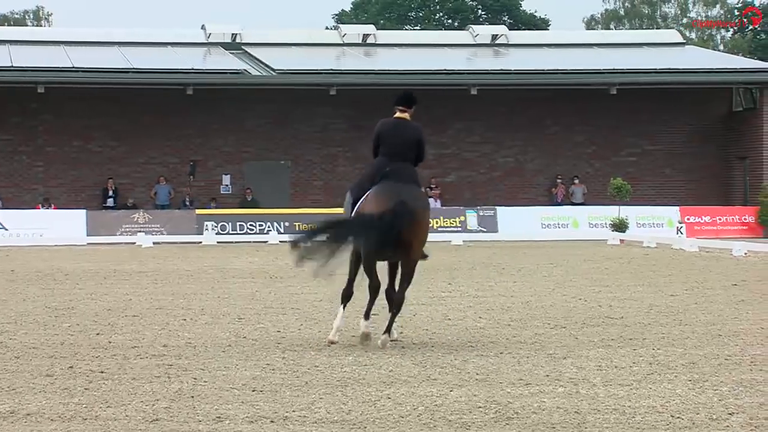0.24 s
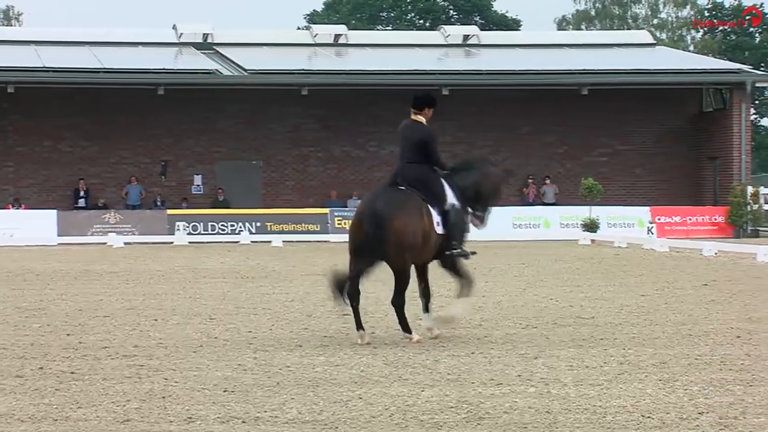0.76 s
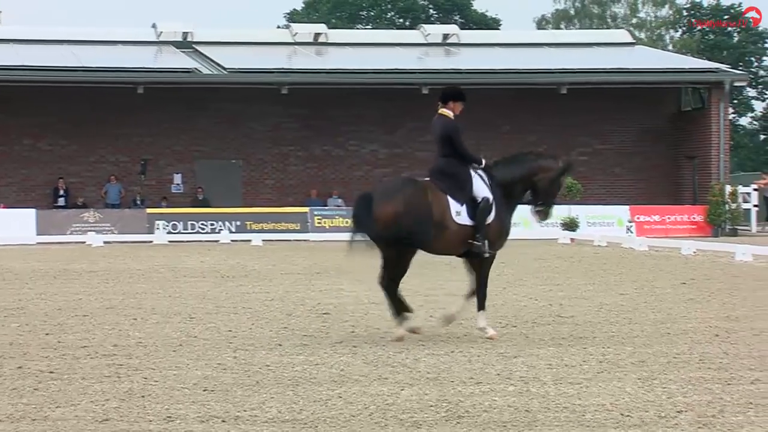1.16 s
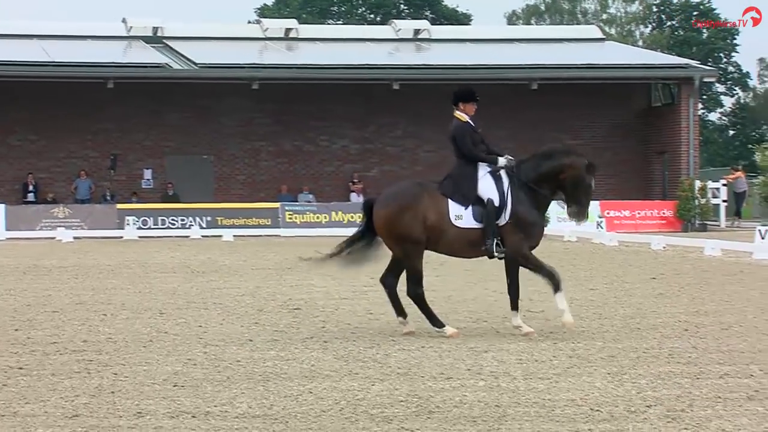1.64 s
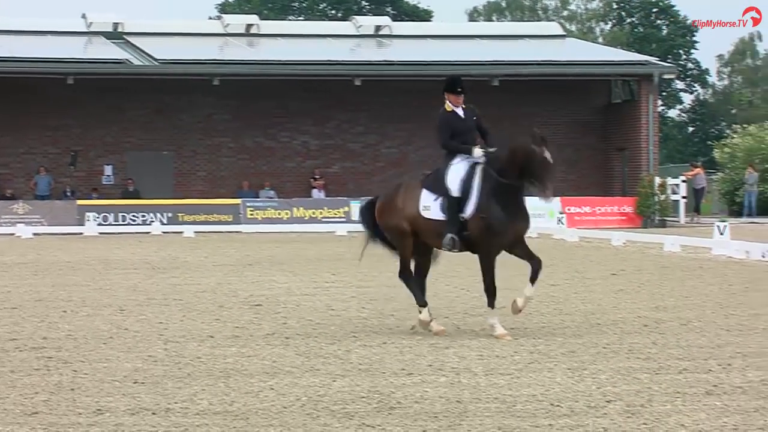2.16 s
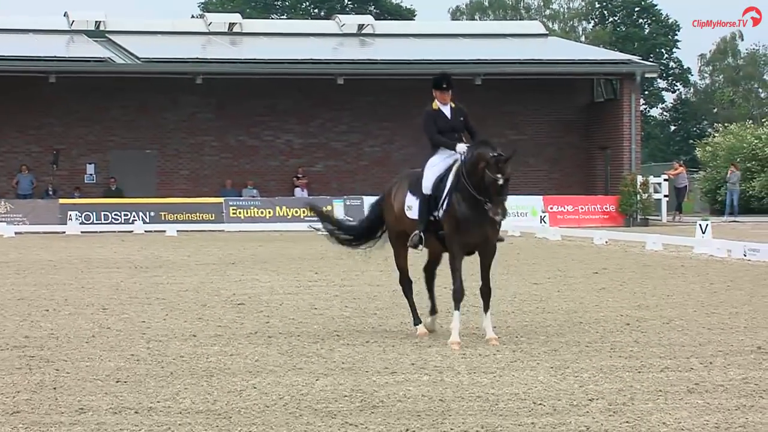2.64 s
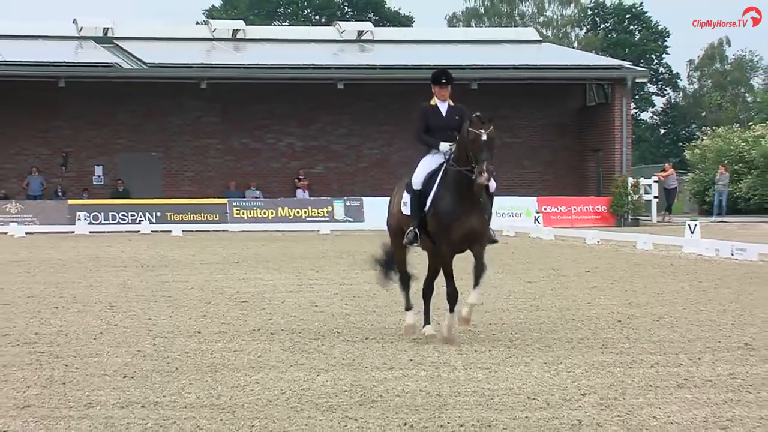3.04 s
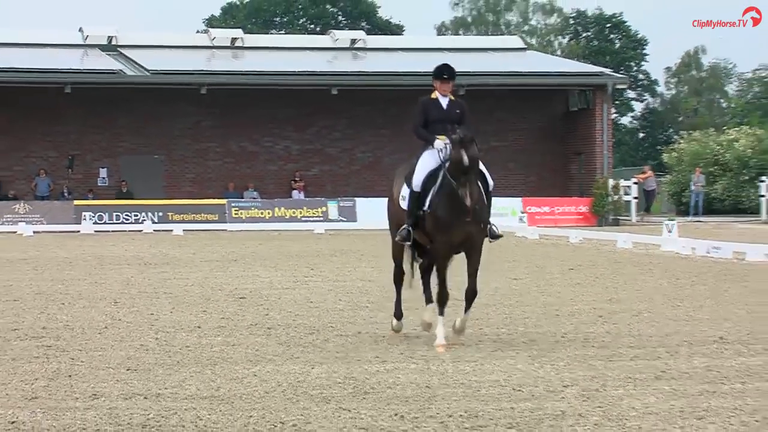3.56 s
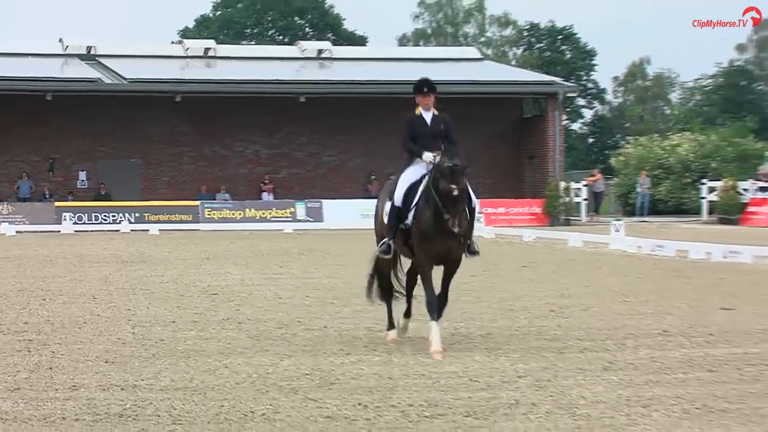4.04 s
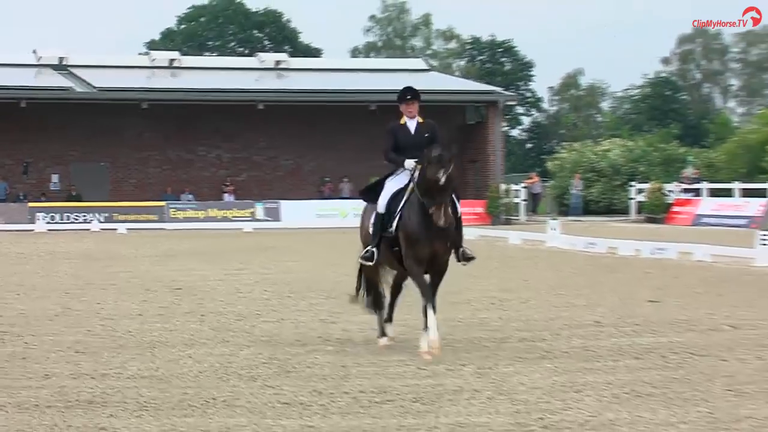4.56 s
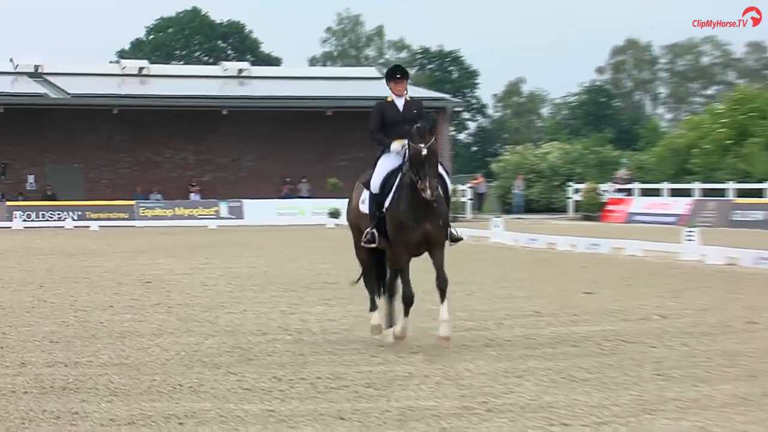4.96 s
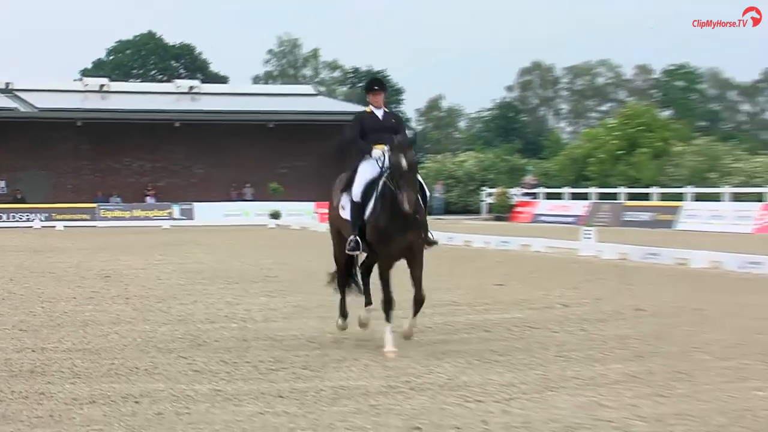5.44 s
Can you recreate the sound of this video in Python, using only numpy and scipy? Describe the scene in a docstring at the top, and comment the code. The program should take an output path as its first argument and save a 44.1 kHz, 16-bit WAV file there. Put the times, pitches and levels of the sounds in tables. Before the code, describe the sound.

Some way off in an open sandy arena, a horse canters with soft, grouped hoof thuds, dull knocks and brief crunches. It breathes in time, drawing hissing air and snorting with loose nostril flaps, more strongly later. Tack ticks faintly. Small birds and a blackbird open the scene; a chaffinch phrase takes over in the second half. Low wind nudges the microphone over a quiet countryside murmur.

```python
"""A horse canters on the sand of an outdoor arena, some way off: damped thuds, knocks and bursts of crunching noise.
It draws air and snorts it out through flapping nostrils (coloured noise under swelling envelopes); the tack ticks
and there are two faint squeaks. A blackbird, a chaffinch and small twittering birds sing in the trees (warbling sine
tones with scatter and tails). A light wind rumbles on the microphone over a steady countryside murmur."""
import sys
import numpy as np
from scipy import signal
from scipy.fft import rfft, irfft
from scipy.io import wavfile
from scipy.ndimage import uniform_filter1d

SR = 44100
rng = np.random.default_rng(int(sys.argv[2]) if len(sys.argv) > 2 else 0)


def unload_wav(signal):
    """Save mono or channel-first audio to the path in sys.argv[1] as 16-bit WAV at rate SR, clipped to [-1, 1]."""
    wavfile.write(
        sys.argv[1],
        SR,
        np.round(np.clip(np.atleast_2d(signal).T, -1, 1) * 32767).astype(np.int16),
    )


N = 251811
TIME = np.arange(N) / SR   # s
CUTOFF_HZ = 15000

# Event levels are relative: group gains and envelopes follow.

# gusts on the microphone: strongest t/s, length/s, level/dB
GUSTS = [(.19, .4, -48), (.62, .18, -53), (1.28, .7, -36), (1.7, .6, -39), (2.15, .5, -48),
         (2.48, .16, -41), (2.8, .5, -43), (3.27, .46, -36.5), (3.7, .9, -42.5), (4.33, .24, -39),
         (5.0, .55, -41), (5.37, .34, -36), (5.62, .22, -44)]
WIND_DB, BREEZE_DB, AIR_DB = -1, -65, -60.4   # gust gain, breeze between gusts, countryside murmur
# wind and countryside spectra: f/Hz, relative density/dB per Hz
WIND_COLOUR = [(8, -8), (15, 8.5), (26, -2), (40, -6.5), (60, -19.5), (100, -30), (200, -53), (500, -87)]
AIR_COLOUR = [(30, -3), (70, 0), (150, 0), (250, -6.5), (420, -10.5), (700, -20.5), (1000, -28),
              (1400, -37), (2300, -39.5), (3400, -33), (5000, -37), (7000, -46.5), (12000, -52),
              (15000, -66)]

# snorts: start t/s, strongest t/s, end t/s, level/dB
SNORTS = [(-.05, .05, .4, -61), (1.03, 1.11, 1.23, -59.5), (1.8, 1.94, 2, -56), (2.25, 2.3, 2.49, -64),
          (2.65, 2.7, 2.88, -54.5), (3.3, 3.59, 3.76, -55), (4.04, 4.24, 4.315, -51.8),
          (4.68, 4.87, 4.985, -51.5), (5.32, 5.44, 5.58, -50)]
# air drawn in: start t/s, strongest t/s, end t/s, level/dB
INTAKES = [(.68, .8, 1.02, -65), (1.48, 1.66, 1.77, -64), (2.42, 2.53, 2.7, -68), (3.2, 3.3, 3.4, -64),
           (3.73, 3.84, 4.13, -62.5), (4.42, 4.57, 4.67, -58), (5.03, 5.19, 5.35, -58.5),
           (5.61, 5.72, 6.03, -63)]
# runs of nostril flaps: first t/s, last t/s, flaps, spray level/dB, spray growth/dB per flap, puff level/dB
FLUTTERS = [(1.849, 1.849, 1, -78, 0, -56), (2.3, 2.3, 1, -75.5, 0, -61), (2.677, 2.83, 4, -74.5, -.3, -54),
            (3.536, 3.632, 3, -70.5, 1.6, -53), (4.174, 4.274, 3, -68.5, 4.3, -52),
            (4.761, 4.911, 4, -64.5, 3.2, -43), (5.357, 5.503, 4, -64.5, 3.3, -46.5)]
# puffs peak this far through a run; fall in dB per squared flap from there
PUFF_PEAK_SHARE, PUFF_FALL_DB = .72, 2.4
# breath spectra: f/Hz, relative density/dB per Hz
SNORT_COLOUR = [(60, -3), (150, 1.5), (350, 2), (480, -4), (620, 1.5), (900, -8.5), (1350, -26.5),
                (2200, -29), (3800, -24.5), (6000, -34.5), (10000, -40.5), (15000, -48.5)]
SPRAY_COLOUR = [(600, -21), (1100, 0), (1700, 9.5), (2500, -6), (4000, -3.5), (5500, 2), (7300, 1.5),
                (10000, -5.5), (13000, -15), (16000, -28)]
PUFF_COLOUR = [(40, -23), (95, 0.5), (130, 11), (220, -20), (400, -13.5), (900, -17), (1500, -39)]
INTAKE_COLOUR = [(120, -6), (330, 7), (600, 3.5), (800, -10.5), (1500, -21.5), (3500, -16), (5000, -17),
                 (6600, -23.5), (7700, -30), (9300, -21.5), (11000, -32), (13000, -44)]

# blackbird notes: t/s, length/s, first f/Hz, middle f/Hz, last f/Hz, level/dB, warble depth/Hz
BLACKBIRD = [(0.0, .125, 2080, 2070, 2170, -70, 100), (.09, .22, 2220, 2395, 2136, -75.5, 107),
             (.31, .068, 2316, 2340, 2310, -82, 40), (1.46, .057, 2200, 2340, 2500, -78, 9),
             (1.5, .039, 2056, 2094, 2150, -67, 3), (1.68, .084, 2250, 2156, 2210, -75.5, 126),
             (2.0, .053, 1740, 1800, 2350, -73.5, 3), (2.05, .029, 2230, 2080, 1710, -73, 0),
             (2.18, .205, 1560, 1589, 1545, -75.5, 0), (2.48, .066, 2880, 2260, 1760, -77, 3),
             (2.57, .045, 2880, 2410, 2000, -77.5, 60), (3.04, .06, 1740, 2350, 3100, -86, 0),
             (5.19, .07, 2310, 2260, 2320, -79, 0)]
# small birds' call notes: delay/s, length/s, first, middle, last f/share of call pitch, level/dB, warble depth/Hz
CHIP = [(0, .031, .78, 1, .77, 0, 0)]
DROOP = [(0, .032, 1, .97, .88, 0, 0)]
SLUR = [(0, .03, .88, 1, 1.06, 0, 0)]
CHIRRUP = [(0, .022, .97, 1.02, .99, -.5, 170), (.02, .026, .95, .87, .85, 0, 170),
           (.05, .023, .84, .74, .72, -2.5, 120)]
# arched chips, drooping peeps, rising slurs, three-step falling chirrups: t/s, pitch f/Hz, level/dB
CHIPS = [(.016, 5220, -83), (.07, 5300, -84), (.113, 5150, -79), (.207, 4850, -77.5), (.248, 3250, -77.5),
         (.33, 5900, -84), (.345, 4600, -82), (.74, 5600, -75), (.74, 4860, -72), (.79, 5820, -79),
         (.826, 4750, -70), (1.545, 5540, -78.5), (3.368, 5000, -76), (5.268, 5740, -76)]
DROOPS = [(1.968, 5500, -82), (2.11, 5250, -83), (2.322, 5350, -80), (4.168, 5550, -82), (4.31, 5480, -78),
          (4.59, 5900, -76), (4.94, 5700, -78)]
SLURS = [(.65, 3500, -76), (.9, 3780, -77.5), (1.358, 3900, -78), (1.405, 3100, -79), (2.058, 4250, -79),
         (2.195, 4200, -82), (2.567, 3880, -75.5), (2.612, 3100, -77), (3.045, 4440, -77.5)]
CHIRRUPS = [(1.56, 4540, -70), (1.73, 4650, -74), (2.698, 4500, -69.5), (3.526, 4500, -67)]
# drawn-out whistles: t/s, length/s, first f/Hz, middle f/Hz, last f/Hz, level/dB, warble depth/Hz
WHISTLES = [(.425, .045, 6520, 6700, 6600, -87.5, 0), (.48, .16, 3350, 3150, 3250, -81.5, 200),
            (1.07, .125, 4560, 3850, 3400, -71.5, 0), (2.88, .1, 6940, 6800, 6740, -88.5, 0),
            (3.12, .04, 4730, 3940, 2880, -78.5, 0)]

# hoof falls: t/s, thud level/dB, knock level/dB, sand crunch level/dB
HOOF_FALLS = [(.104, -52.5, -47, -51.5), (.115, -42.5, -54, -62), (.261, -54, -51, -53),
              (.372, -52, -58, -76), (.638, -60, -66, -55.5), (.783, -38.5, -52, -55),
              (.886, -41.5, -52, -58), (1.419, -55, -66, -59.5), (1.537, -46, -62, -59),
              (1.671, -39.5, -60, -58), (1.839, -52, -55, -57.5), (2.457, -46.5, -56, -62),
              (2.542, -49, -60, -57.5), (3.092, -51.5, -66, -59), (3.291, -45, -72, -78),
              (3.323, -48.5, -53, -53), (3.992, -33.8, -52, -58), (4.058, -45, -61, -63),
              (4.622, -37.5, -41.5, -44.5), (4.673, -56, -52, -60), (5.249, -40.5, -50, -54.5)]
# heavier falls sink deeper and sound lower: full-weight pitch and level, rise for lighter ones
THUD_HZ, FULL_WEIGHT_DB, LIGHTER_OCTAVES_PER_DB = 145, -36, .04
KNOCK_HZ = 500   # hoof wall meeting the sand
# sand crunch spectrum: f/Hz, relative density/dB per Hz
CRUNCH_COLOUR = [(100, -20.5), (350, 8.5), (750, 4.5), (1100, -2.5), (1500, -32), (4000, -22.5),
                 (10000, -46)]

# bit and buckles: t/s, level/dB
TACK_TICKS = [(0.984, -65), (1.4734, -57.5), (1.751, -58.5), (2.042, -65.5), (2.288, -72.5), (2.873, -64.5),
              (3.064, -62.5), (4.996, -72), (5.017, -59.5)]
# tick spectrum: f/Hz, relative density/dB per Hz
TICK_COLOUR = [(2000, -2), (3500, 18.5), (6000, 9.5), (9500, -1), (12000, -16)]

# chaffinch syllable shapes: t from syllable time/s, f at pitch factor 1/Hz, level/dB
HOOK = [(0, 2874, -11), (.008, 3650, -5.5), (.018, 3813, -3), (.033, 3726, -2.5), (.036, 5370, -16),
        (.041, 4800, -11), (.052, 4110, -4.5), (.06, 4100, -28)]
SLIDE = [(-.004, 4770, -24), (.002, 4566, -10.5), (.012, 3900, -4.5), (.025, 3136, -7.5), (.037, 2820, -10),
         (.046, 2910, -22), (.053, 2900, -34)]
DIP = [(0, 4970, -10.5), (.007, 3222, -15), (.022, 2570, -14.5), (.03, 3062, -11.5), (.043, 3380, -2.5),
       (.049, 3300, -5), (.053, 2430, -20), (.072, 1964, -25)]
# opening hooks: t/s, pitch factor, level/dB
HOOKS = [(3.258, 1.11, -68.5), (3.472, 1.1, -65.5), (3.677, 1.06, -60.5), (3.851, 1.015, -58.5),
         (4.031, 1.02, -57.5)]
# buzz leading each hook: delay/s, length/s, first, middle, last f/Hz at factor 1, level re hook/dB, warble depth/Hz
LEAD_BUZZ = [(-.057, .048, 5500, 5150, 4900, -14, 450)]
# even trills: start t/s, syllables, period/s, pitch factor, level/dB
SLIDE_TRILL = (4.133, 6, .0831, .985, -54.7)
DIP_TRILL = (4.711, 4, .1392, .96, -54.5)
# one more dip before the flourish: t/s, pitch factor, level/dB
LAST_DIP = (5.472, .93, -56.5)
# two-voiced note between the trills: t/s, length/s, first f/Hz, middle f/Hz, last f/Hz, level/dB
BRIDGE = [(4.657, .03, 4680, 4840, 4840, -65), (4.683, .031, 3640, 3620, 4030, -59.5),
          (4.708, .022, 3700, 2900, 2760, -62.5)]
# closing buzzes, then flourish: t/s, length/s, first f/Hz, middle f/Hz, last f/Hz, level/dB, warble depth/Hz
BUZZES = [(5.298, .04, 5260, 4500, 4120, -61, 454), (5.408, .034, 5170, 4480, 3970, -60.5, 452)]
FLOURISH = [(5.62, .075, 4700, 3850, 2750, -61.5, 304)]

# faint low squeaks: t/s, length/s, first f/Hz, middle f/Hz, last f/Hz, level/dB
SQUEAKS = [(3.33, 0.034, 603, 632, 606, -60), (3.745, 0.066, 807, 630, 576, -67.5)]

# echoes from the stand and the trees: delay/s, level/dB
ECHOES = [(.047, -23), (.105, -23.5)]
NEAR_DECAY_S = .014


def from_db(db):
    """dB to amplitude."""
    return 10 ** (np.asarray(db) / 20)


def rms_one(x):
    """Scale to rms 1."""
    return x / np.sqrt(np.mean(x ** 2) + 1e-20)


def evened(x, size):
    """Hold the rms near 1 over every stretch of size samples."""
    return x / np.sqrt(uniform_filter1d(x ** 2, size) + 1e-9)


def add(track, s, sound):
    """Mix a sound into the track at time s."""
    start = max(0, int(s * SR))
    part = sound[:max(0, N - start)]
    track[start:start + len(part)] += part


def noise(spectrum):
    """Noise of the given colour, falling away beyond its ends; rms 1."""
    hz, db = np.transpose(spectrum)
    f = np.maximum(np.fft.rfftfreq(N, 1 / SR), 1)
    skirts = 1 / (1 + (f / hz[-1] / 2) ** 4) / (1 + (hz[0] / f / 2) ** 4)
    gain = from_db(np.interp(np.log(f), np.log(hz), db)) * skirts
    return rms_one(irfft(rfft(rng.standard_normal(N)) * gain, N))


def drift(rate_hz):
    """Random piecewise-linear wander, rate_hz knots a second; rms 1."""
    knots = rng.standard_normal(N // 8)
    return rms_one(np.interp(TIME * rate_hz, np.arange(len(knots)), knots))


def swells(rows, sharpness):
    """Summed envelopes, each rising to its strongest point and dying away."""
    total = np.zeros(N)
    for start, top, end, db in rows:
        phase = np.interp(TIME, [start, top, end], [0, np.pi / 2, 0])
        total += from_db(db) * np.sin(phase) ** sharpness
    return total


def outdoors(x, near_db, far_db, t60_s):
    """Close scatter blurs each sound; then a few echoes and a tail that stirring leaves keep shimmering."""
    t = TIME[:SR]
    scatter = rng.standard_normal(SR) * np.exp(-t / NEAR_DECAY_S)
    near = from_db(near_db) * rms_one(scatter) / np.sqrt(SR)   # unit energy, then level
    tail = rng.standard_normal(SR) * from_db(-60 * t / t60_s) * np.minimum(t / 0.011, 1)
    far = from_db(far_db) * rms_one(tail) / np.sqrt(SR)
    for delay, db in ECHOES:
        add(near, delay, from_db([db]))
    shimmer = drift(260)
    return x + signal.fftconvolve(x, near)[:N] + signal.fftconvolve(x, far)[:N] * shimmer


def whistle(hz, gain):
    """Pure tone along a pitch path; gain is its rms."""
    return np.sqrt(2) * gain * np.sin(2 * np.pi * np.cumsum(hz) / SR)


def notes(rows, warble_hz, unsteady):
    """Tones bending through three pitches, with a sine warble and a random pitch wander of rms share unsteady."""
    out, waver = np.zeros(N), 1 + unsteady * drift(350)
    for s, length, first, middle, last, db, *warble_depth in rows:
        t = TIME[:int(length * SR)]
        u = t / length
        hz = np.polyval(np.polyfit([0, .5, 1], [first, middle, last], 2), u)
        hz = hz * np.roll(waver, -int(s * SR))[:len(t)]
        hz = hz + sum(warble_depth) * np.sin(2 * np.pi * warble_hz * t)   # depth 0 if no column
        add(out, s, whistle(hz, from_db(db) * np.sin(np.pi * u) ** (1 / 3)))
    return out


def calls(shape, rows):
    """The notes of one call, repeated at each row's time, pitch and level."""
    return [(s + delay, length, pitch * first, pitch * middle, pitch * last, db + note_db, warble)
            for s, pitch, db in rows
            for delay, length, first, middle, last, note_db, warble in shape]


def air():
    """Gusts swell and die on the microphone, over a light breeze and the steady murmur of the countryside."""
    spans = [(s - length / 2, s, s + length / 2, db) for s, length, db in GUSTS]
    strength = from_db(WIND_DB) * swells(spans, sharpness=1.3) + from_db(BREEZE_DB)
    wind = strength * evened(noise(WIND_COLOUR), size=3000)
    murmur = from_db(AIR_DB + 1.0 * drift(14)) * noise(AIR_COLOUR)
    return wind + murmur


def flaps():
    """Evenly spaced flaps: spray level steps through a run, puffs swell and fade. Gives (s, spray dB, puff dB)."""
    for first, last, count, spray_db, growth_db, puff_db in FLUTTERS:
        steps = count - 1
        for k, s in enumerate(np.linspace(first, last, count)):
            puff_fall_db = PUFF_FALL_DB * (k - PUFF_PEAK_SHARE * steps) ** 2
            yield s, spray_db + growth_db * (k - steps / 2), puff_db - puff_fall_db


def nostrils(open_s=.014, shut_s=.005, wet_db=3.7, flutter_db=2.7):
    """Hissing intakes and hollow snorts; each nostril flap swells to a puff and spray, then snaps shut."""
    spray, puff = np.zeros(N), np.zeros(N)
    for s, spray_db, puff_db in flaps():
        opening = np.exp(-((TIME - s) / np.where(TIME < s, open_s, shut_s)) ** 2 / 2)
        spray += from_db(spray_db) * opening
        puff += from_db(puff_db) * opening
    snort = swells(SNORTS, sharpness=0.56) * evened(noise(SNORT_COLOUR), size=600)
    snort *= from_db(flutter_db * drift(90) - 3.3)
    wet_spray = spray * noise(SPRAY_COLOUR) * from_db(wet_db * drift(450) - 3.5)
    low_puff = puff * evened(noise(PUFF_COLOUR), size=600)
    intake = swells(INTAKES, sharpness=0.97) * noise(INTAKE_COLOUR) * from_db(1.0 * drift(160) - 1.5)
    return snort + wet_spray + low_puff + intake


def flock(count, level_db):
    """Faint arched chirps at random moments and pitches."""
    when, long, pitch, end, far = rng.random((count, 5)).T
    hz = 3000 + 2100 * pitch
    length_s = .02 + .02 * long
    last_hz = (.7 + 0.27 * end) * hz
    rows = np.transpose([when * TIME[-1], length_s, 0.95 * hz, hz, last_hz, level_db - 6 * far])
    return outdoors(notes(rows, warble_hz=0, unsteady=0.0099), near_db=-6, far_db=-10.5, t60_s=0.35)


def far_birds():
    """Birds deeper in the trees, notes smeared by the foliage; the small ones flutter in level."""
    fluting = notes(BLACKBIRD, warble_hz=54, unsteady=0.0043)
    blackbird = outdoors(fluting, near_db=-9, far_db=-9, t60_s=.8)
    song = calls(CHIP, CHIPS) + calls(DROOP, DROOPS) + calls(SLUR, SLURS) + calls(CHIRRUP, CHIRRUPS) + WHISTLES
    fluttering = notes(song, warble_hz=120, unsteady=.011) * from_db(1.5 * drift(220))
    twitter = outdoors(fluttering, near_db=-7, far_db=-5.3, t60_s=.7)
    return from_db(2.0) * blackbird + from_db(1.5) * twitter + flock(count=90, level_db=-83)


def swing(hz, db, damping):
    """One heavily damped swing, its main trough near half a cycle in."""
    cycles = TIME[:SR // 4] * hz
    envelope = (cycles * damping * np.exp(1 - cycles * damping)) ** 2
    return from_db(db) * envelope * np.cos(2 * np.pi * cycles)


def hooves(damping=1.57, knock_damping=1.3, crunch_s=.0058, settle_s=.015, settle_db=-18):
    """Ground gives one damped swing under each hoof; the hoof knocks, the sand crunches and settles."""
    thuds, press, t = np.zeros(N), np.zeros(N), TIME[:SR // 4]
    grind = np.exp(-t / crunch_s) + from_db(settle_db) * np.exp(-t / settle_s)
    grind *= np.minimum(t / 0.0017, 1)
    for s, thud_db, knock_db, crunch_db in HOOF_FALLS:
        hz = THUD_HZ * 2 ** (LIGHTER_OCTAVES_PER_DB * max(FULL_WEIGHT_DB - thud_db, 0))
        add(thuds, s - .5 / hz, swing(hz, thud_db, damping))
        add(thuds, s - .5 / KNOCK_HZ, swing(KNOCK_HZ, knock_db, knock_damping))
        add(press, s - .005, from_db(crunch_db) * grind)
    crunch = 1.55 * press * evened(noise(CRUNCH_COLOUR), size=300)
    return outdoors(thuds + crunch, near_db=-25, far_db=-18.5, t60_s=0.47)


def tack(decay_s=.0024, gain_db=-4):
    """Short bright ticks of metal on metal: decaying noise."""
    touch = np.zeros(N)
    for s, db in TACK_TICKS:
        add(touch, s, from_db(db + gain_db) * np.exp(-TIME[:SR // 20] / decay_s))
    return touch * evened(noise(TICK_COLOUR), size=60)


def trill(start, count, period, pitch, db):
    """One syllable repeated at an even pace."""
    return [(start + k * period, pitch, db) for k in range(count)]


def chaffinch():
    """Buzz-led hooks and two even trills, then loud buzzes and a closing flourish; all gliding tones."""
    out = notes(calls(LEAD_BUZZ, HOOKS) + BUZZES, warble_hz=190, unsteady=0.025)
    out += notes(FLOURISH, warble_hz=75, unsteady=.04)
    out += notes(BRIDGE, warble_hz=0, unsteady=.012)
    slides = trill(*SLIDE_TRILL)
    dips = trill(*DIP_TRILL) + [LAST_DIP]
    for shape, run in ((HOOK, HOOKS), (SLIDE, slides), (DIP, dips)):
        at, hz, db = np.transpose(shape)
        t = np.arange(at[0], at[-1], 1 / SR)
        for s, pitch, level_db in run:
            gain = from_db(level_db + np.interp(t, at, db))
            add(out, s + at[0], whistle(pitch * np.interp(t, at, hz), gain))
    return outdoors(out, near_db=-4, far_db=-9.5, t60_s=1.0)


def squeaks():
    """Faint low squeaks: short, slightly unsteady tones."""
    return notes(SQUEAKS, warble_hz=0, unsteady=0.015)


def scene():
    """Sum of all sources, one channel."""
    horse = hooves() + nostrils() + tack() + squeaks()
    return (horse + chaffinch() + far_birds() + air())[None]


def record(dry):
    """Steep elliptic low-pass at CUTOFF_HZ."""
    return signal.sosfilt(signal.ellip(10, .1, 80, CUTOFF_HZ, fs=SR, output="sos"), dry)


dry = scene()
out = record(dry)
unload_wav(out)
```